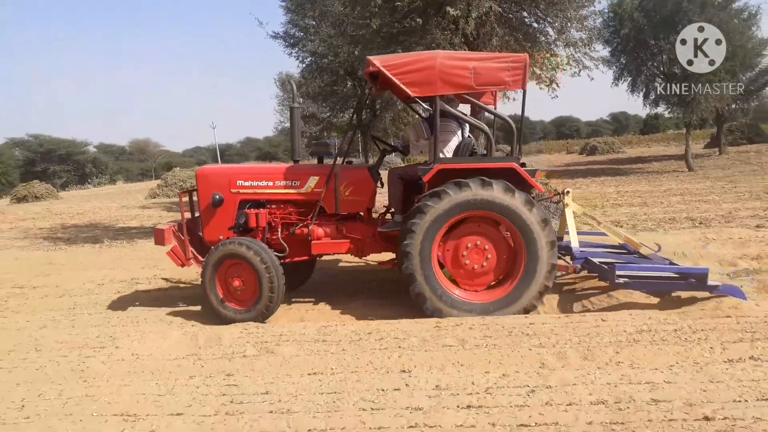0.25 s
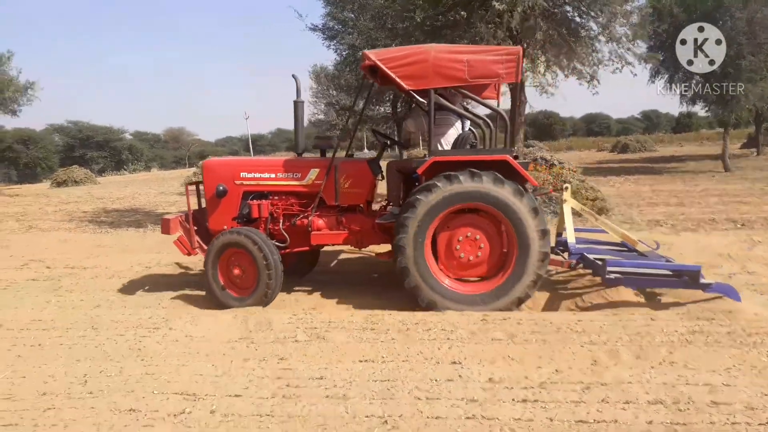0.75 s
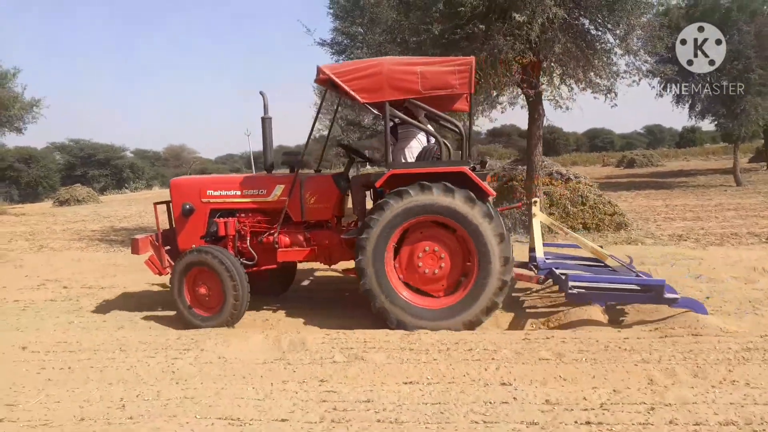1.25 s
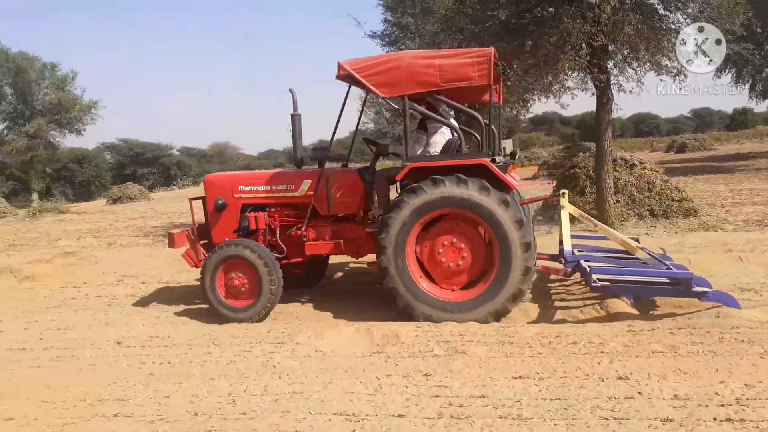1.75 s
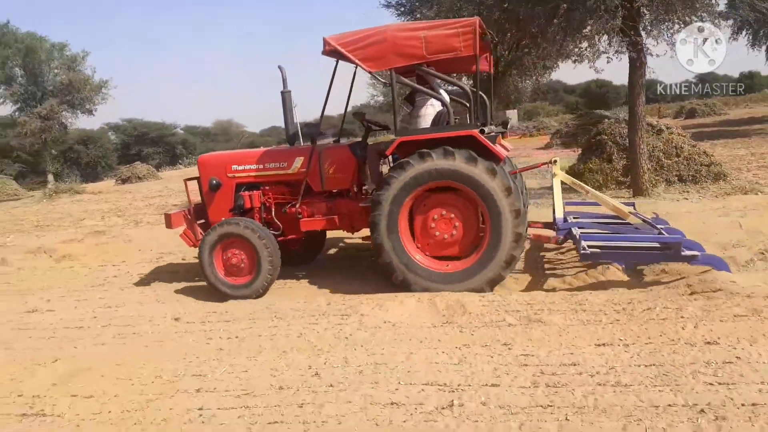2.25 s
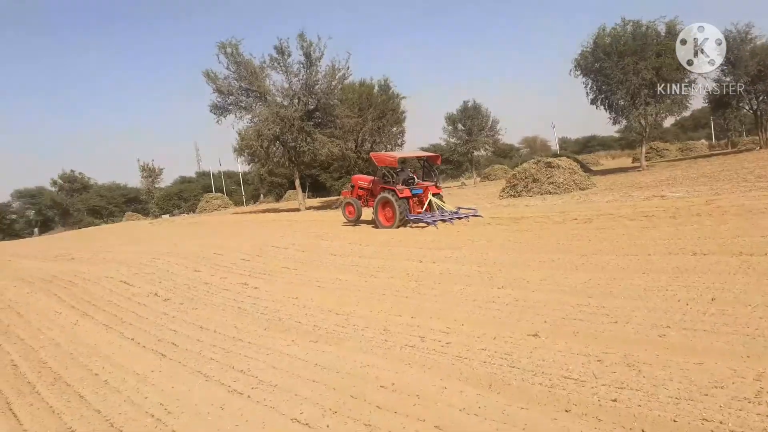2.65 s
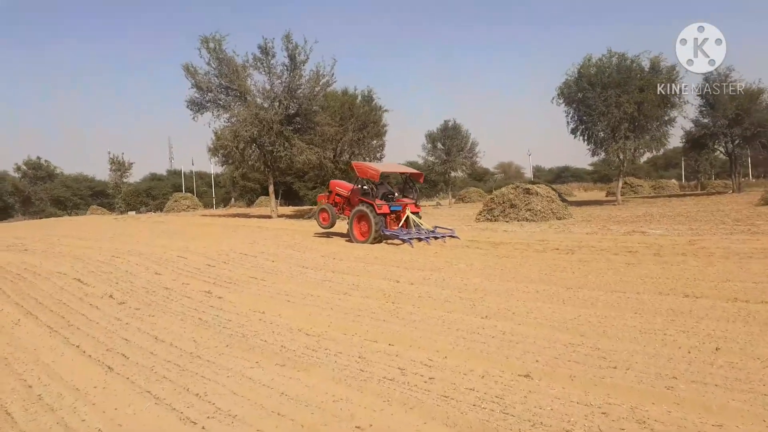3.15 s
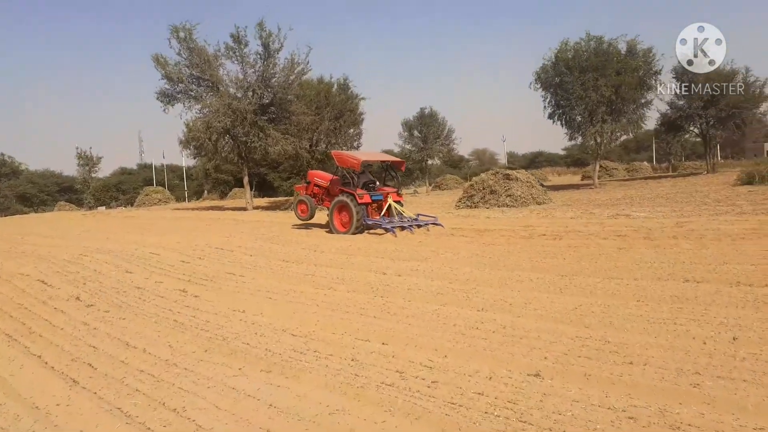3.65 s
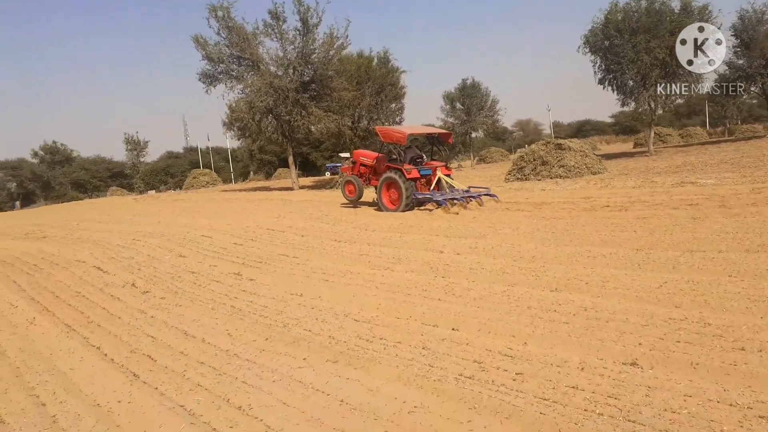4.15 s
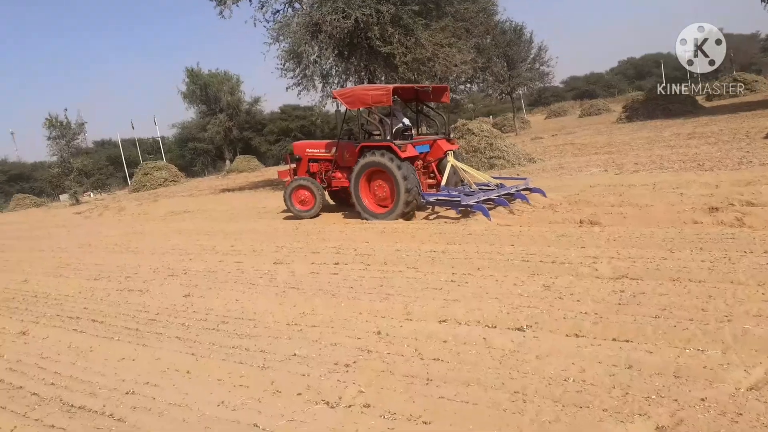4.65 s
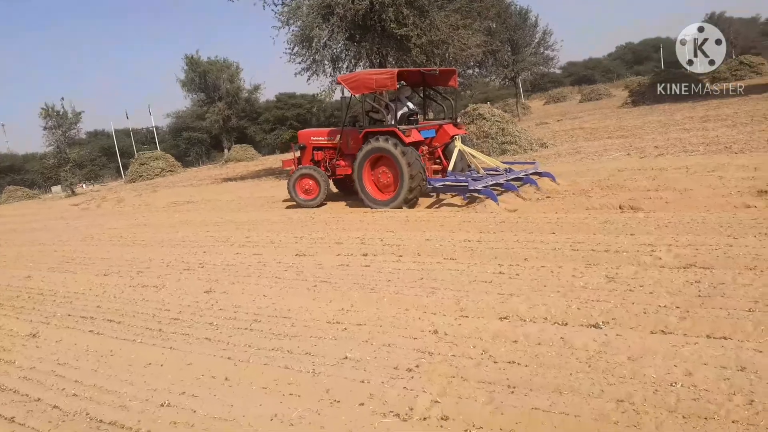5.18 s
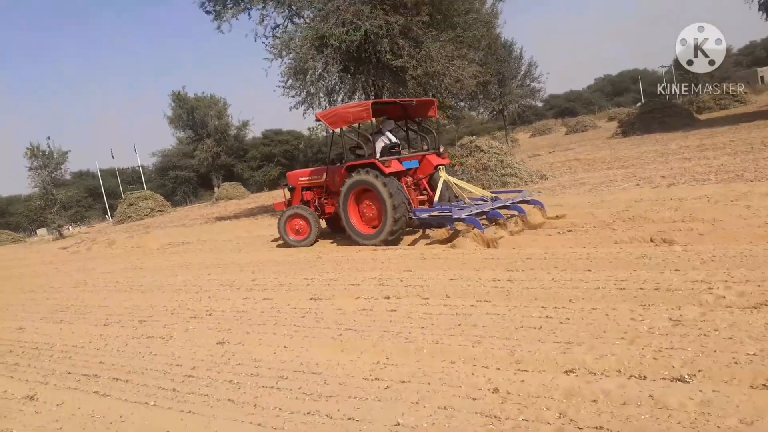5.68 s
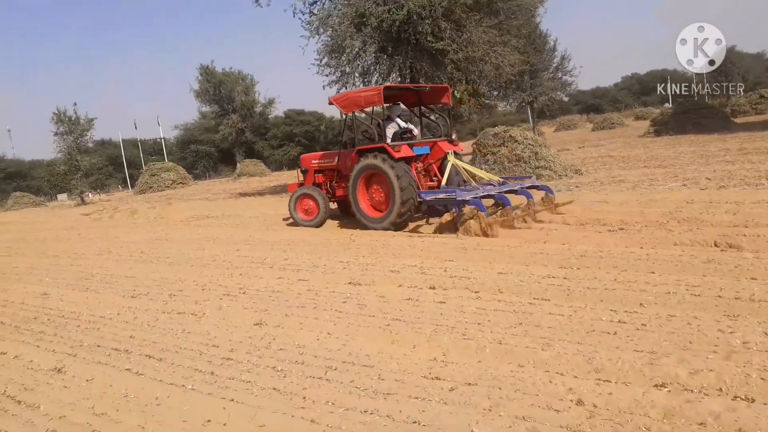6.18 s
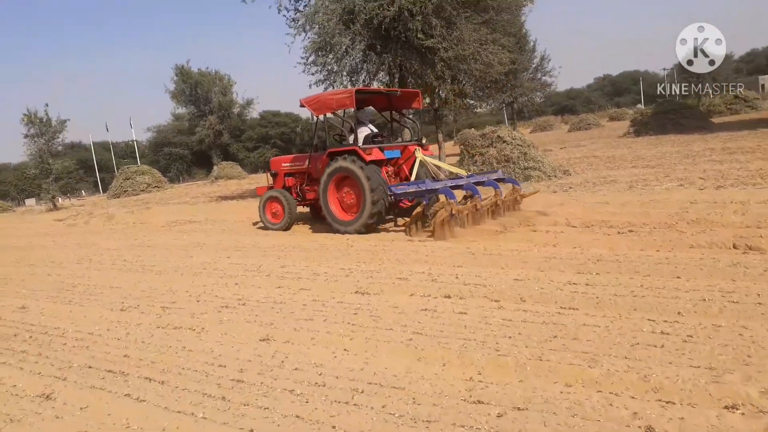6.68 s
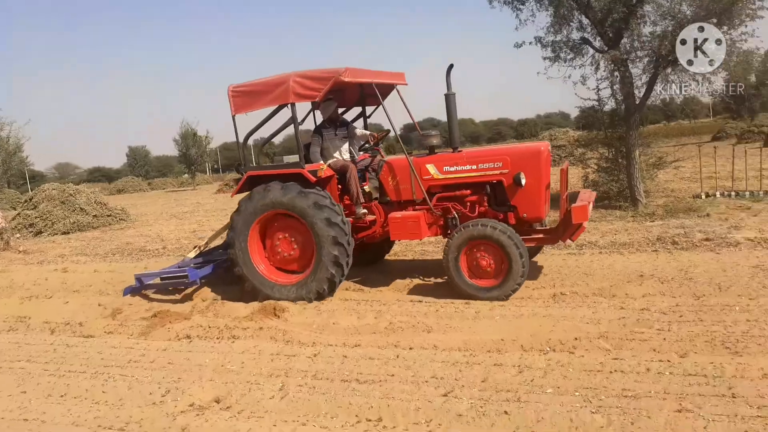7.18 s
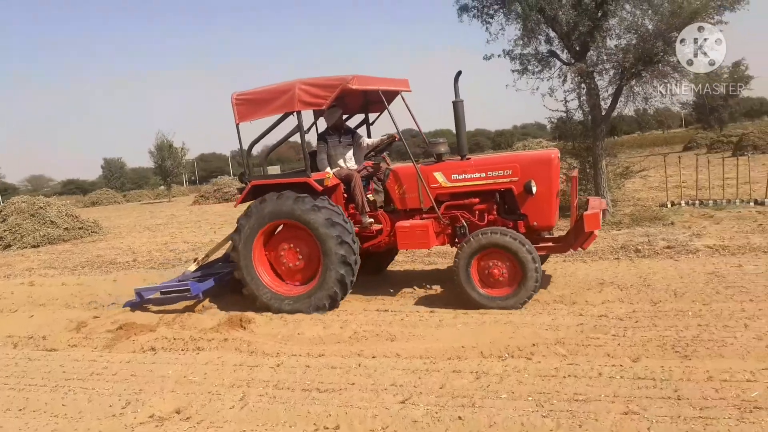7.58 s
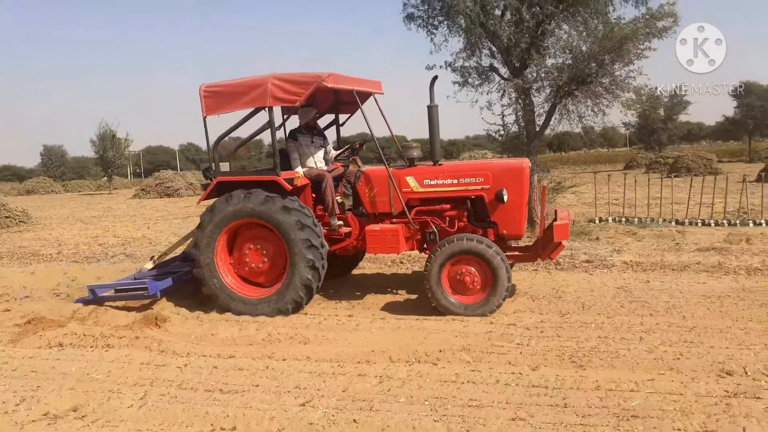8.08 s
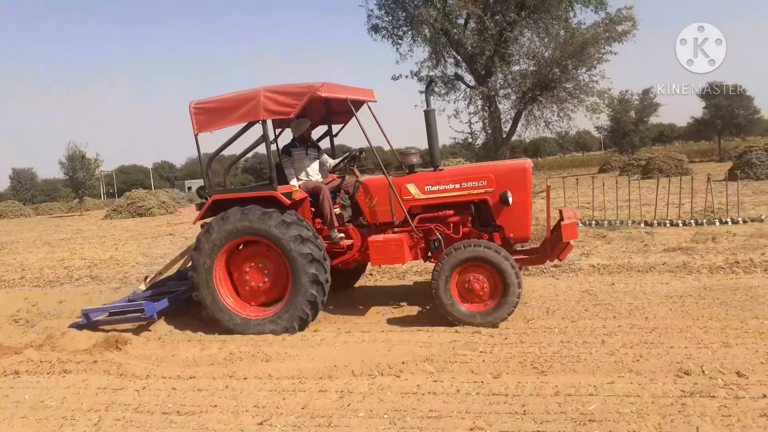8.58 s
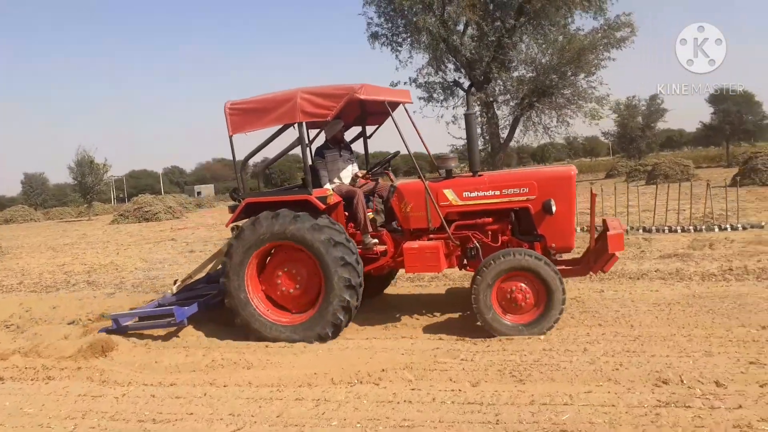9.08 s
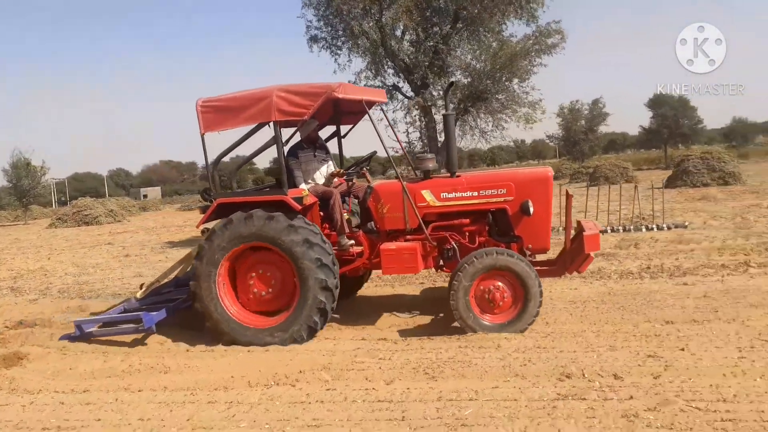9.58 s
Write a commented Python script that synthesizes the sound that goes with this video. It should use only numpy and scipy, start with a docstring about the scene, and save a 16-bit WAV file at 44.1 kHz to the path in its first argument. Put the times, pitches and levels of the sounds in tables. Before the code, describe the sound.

Continuous rapid diesel firing, a low exhaust drone under metallic clatter and gritty rasp, slightly uneven from stroke to stroke. Load makes the pitch sag and the rasp swell. Four outdoor viewpoints are joined abruptly: near, far, middling, near again. Wind rumbles low, with dull thumps striking left or right in the second half. A blink of silence separates the last two views; dry open air, no echo.

```python
"""Diesel tractor working a field

A four-cylinder diesel tractor drags an implement through loose soil, heard from four places in turn.
Each firing booms in the exhaust, rings the metalwork and sets off a burst of clatter and rasp, some harder.
When the soil drags the speed down, the governor feeds more fuel and the rasp swells.
Wind rumbles on two microphone ports and eddies thump them; the sound drops out briefly near 7 s."""
import sys
import numpy as np
from scipy import signal
from scipy.fft import rfft, irfft, next_fast_len
from scipy.io import wavfile
from scipy.ndimage import uniform_filter1d, map_coordinates

SR = 44100
rng = np.random.default_rng(int(sys.argv[2]) if len(sys.argv) > 2 else 0)


def int16_out(signal):
    """Quantize to a 16-bit WAV file."""
    q = np.round(np.clip(np.atleast_2d(signal).T, -1, 1) * 32767)
    wavfile.write(sys.argv[1], SR, q.astype(np.int16))


N = 433503
TIME_S = np.arange(N) / SR

# Listening places: start_s, rasp_rest_db, clatter_rest_db (nominal levels between firings),
# burst_s (nominal), alike_hz (ports differ above), right_lag_samples (rounded in use)
PLACES = [(0, -12, -4, 0.011, 2340, 1.5), (2.655, -15, -5.5, 0.012, 3580, 1.5),
          (4.515, -13, -4.5, 0.013, 1790, -1), (7.0, -19.5, -5, 0.013, 1850, -2.5)]
# Levels per place: clatter_db, rasp_db, rasp_gain_at_full_fuel_db, nearing_db_per_s, breeze_db (before trim)
LEVELS = [(-2, -2.5, 4.5, -0.66, -50), (-3.5, -8.5, 11.5, 1, -39), (-2, -9.5, 10, -0.6, -32),
          (0.5, -7, 6.5, 0.13, -29)]

# Wind spectrum, relative: freq_hz, density_db_per_hz
WIND_COLOUR = [(25, -22), (42, -10), (62, 2.5), (90, 1), (150, -0.5), (230, -1), (345, -12), (640, -24),
               (1200, -46)]
# Gusts on the ports: centre_s, level_db, sigma_s
GUSTS = [(0.418, -31, 0.018), (1.095, -32, 0.044), (1.327, -31, 0.027), (1.593, -35, 0.053),
         (3.27, -36, .022), (6.377, -26.5, 0.08), (8.753, -28, 0.12), (9.578, -29, 0.035)]
# Buffets: start_s, peak_db (nominal), string_length_s, eddy_pitch_hz, left_minus_right_db
BUFFETS = [(4.657, -14, .005, 170, -14), (5.028, -12, .008, 90, 12), (5.047, -13.5, .018, 160, 10),
           (5.32, -16, .016, 221, -8), (5.408, -15, .014, 250, -4), (6.262, -13, .006, 100, 14),
           (6.328, -8.5, .031, 240, 11), (6.416, -10, .006, 135, 10), (6.569, -11, .017, 145, 10),
           (7.24, -12.5, 0.032, 130, -13), (7.6, -10.5, .014, 130, -9), (8.005, -12.5, .012, 220, -11),
           (8.256, -12, .008, 130, -12), (8.338, -12, .02, 150, -12), (8.848, -8.5, .012, 80, 9),
           (8.879, -12, 0.0077, 170, 11), (9.008, -10, .014, 140, -11.5), (9.219, -12, 0.0087, 150, -14),
           (9.358, -12, .016, 119, -13)]

# Engine per place: first_cylinder_firing_s, governed_firing_rate_hz
GOVERNOR = [(0.081, 44.24), (2.707, 44.29), (4.567, 45.16), (7.0302, 43.82)]
# Implement digs in (sag > 0) or rides up (sag < 0): centre_s, firing_rate_sag_hz, half_length_s
DRAG = [(1.28, -1.54, 0.3), (1.98, 1.25, 0.17), (2.89, 6.41, 0.42), (3.36, 5.2, 0.27), (4.53, 3.86, 0.27),
        (5.08, 5.64, 0.62), (7.17, 2.52, 0.19), (8.61, 2.76, 0.26), (9.22, 1.1, 0.57)]
# Sag that opens the rack most of the way, its delay, clatter gained at full fuel
DROOP_HZ, GOVERNOR_LAG_S, FUEL_CLATTER_DB = 2.3, 0.018, 2
# A slower engine is quieter
CLATTER_DB_PER_HZ, RASP_DB_PER_HZ = 0.2554, 0.69
# Driver closes the throttle: time, run-down rate
THROTTLE_OFF_S, COAST_HZ_PER_S = 6.54, 8.2
# Time for the fuel to die away, fall of clatter and rasp without it
CUT_S, CUT_CLATTER_DB, CUT_RASP_DB = 0.18, -6, -4

# Exhaust note per place, before waver and swell: level_db of multiples 1 to 5 of the firing rate
BOOM = [(-37, -26.5, -35, -32.5, -43), (-50, -35, -39, -42, -53), (-43, -30.7, -32.5, -37.5, -44),
        (-40, -28.3, -34, -35.5, -48)]
# Exhaust note gain: time_s, gain_db
BOOM_LEVEL = [(1.4, 1), (2.0, -0.5), (3.05, -1.5), (3.25, 3.5), (3.75, 3), (4.05, -2), (4.55, 2.5),
              (5.6, 1.5), (6.9, -3.5), (7.3, -0.5), (8.8, 0)]
# Silencer resonances at the first place: multiple_of_firing_rate, resonance_hz, level_db (before swell)
OVERTONES = [(8, 354, -37), (12, 525, -35.5)]
# Struck metalwork per place: pitch_hz (mean), level_db (before scatter and swell), ring_s
RINGS = [
    [],
    [],
    [(4380, -39, .005)],
    [(665, -30, .0055)],
]
# Silencer, bonnet and block resonances facing each place: centre_hz, lift_db
PANELS = [
    [(1190, 4.5)],
    [(1355, 4.5), (1665, 3.5), (2100, 6)],
    [(1400, 5.5), (2030, 2.5), (4300, 3)],
    [(975, 3.5), (1170, 3.5)],
]
# Share of the direct noise that repeats each cycle, per place; moving air blurs it: power_share
REPEAT = [.45, .2, .35, .5]
# Harder firings: time_s, extra_db (nominal)
HARD_FIRINGS = [(.604, 2.5), (2.765, 3.5), (3.298, 4), (3.406, 4), (8.671, 3), (8.981, 3), (9.007, 3),
                (9.077, 2.5), (9.356, 3), (9.451, 2)]
# Rasp gain: time_s, gain_db
TREBLE = [(0.0, 2), (.6, -0.5), (2.4, -0.8), (4.6, 1), (5.9, -2), (6.5, -1.2), (7.15, -3), (8.1, -0.5),
          (9.1, 2.5), (9.25, -3.5), (9.42, 3), (9.6, -1), (9.83, 2.5)]
# Bright band sliding past the last place: time_s, centre_hz, lift_db
BRIGHT = [(7.0, 5300, 6), (8.0, 5100, 5.5), (8.65, 5300, 6.5), (9.08, 6060, 4), (9.83, 5640, 3.5)]
# Engine noise spectrum at each place, before swell, left port then right: freq_hz, density_db_per_hz
BESIDE_SPECTRA = ([(150.0, -53.5), (245.0, -55.5), (320, -58), (470.0, -56), (590.0, -65.5), (720.0, -56),
                  (854.0, -62.5), (1152.0, -61.5), (1387.0, -64), (2665.0, -62.5), (3305.0, -69.5),
                  (6212.0, -69.5), (9084.0, -94), (11630.0, -85), (15300.0, -88)], [(150.0, -53),
                  (330, -58), (470.0, -56.5), (590.0, -61), (769.0, -59), (1387.0, -64), (3080.0, -60),
                  (4045.0, -72.5), (5862.0, -70), (8185.0, -65), (10050.0, -76), (11630.0, -67.5),
                  (15300.0, -69.5)])
FAR_SPECTRA = ([(150.0, -57), (284.0, -66.5), (615.0, -66.5), (769.0, -72), (947.0, -68.5), (2117.0, -67.5),
               (3540.0, -81), (4400.0, -91), (5526.0, -74.5), (6576.0, -74), (8626.0, -102), (10559.0, -96),
               (15300.0, -101.0)], [(150.0, -64.5), (615.0, -64.5), (769.0, -77.5), (947.0, -67.5),
               (3540.0, -75.5), (3787.0, -90), (5526.0, -76), (6956.0, -76.5), (8626.0, -99.1),
               (11085.0, -91.5), (15300.0, -102.7)])
BEHIND_SPECTRA = ([(150.0, -53.5), (245.0, -56), (320.0, -63), (400.0, -58.5), (615.0, -61.5), (769.0, -74),
                  (947.0, -64), (2117.0, -66.5), (3540.0, -82), (4316.0, -71.5), (6576.0, -74),
                  (10050.0, -104), (10559.0, -90), (15300.0, -88)], [(150.0, -54.5), (245.0, -54.5),
                  (284.0, -62), (450.0, -58), (769.0, -69.5), (947.0, -67), (1653.0, -67), (2290.0, -73.5),
                  (6956.0, -70.5), (11085.0, -75.5), (15300.0, -90)])
OTHER_SIDE_SPECTRA = ([(150.0, -60.5), (330.0, -64.5), (427.0, -64), (689.0, -60.5), (854.0, -67),
                      (2117.0, -64), (4045.0, -76), (5862.0, -60.5), (7350.0, -64.5), (9084.0, -91),
                      (10559.0, -74.5), (12194.0, -80), (13998.0, -70.5), (15300.0, -80)], [(150.0, -49),
                      (300.0, -57.5), (427.0, -62), (689.0, -60), (854.0, -73), (947.0, -66.5),
                      (2290.0, -68.5), (2472.0, -75), (2665.0, -72), (5526.0, -70), (6956.0, -66),
                      (9558.0, -62), (15300.0, -76.5)])

# Dropout: centre, half length, depth; then the level creeps back
DROPOUT_S, DROPOUT_HALF_S, DROPOUT_DB = 7.004, 0.022, -62
RETURN_DB, RETURN_S = -33, 0.049
TOP_HZ = 15600


def amp(db):
    """Decibels to gain."""
    return 10 ** (np.asarray(db) / 20)


def curve(rows):
    """Second column of a time table, interpolated at every sample."""
    rows = np.array(rows)
    return np.interp(TIME_S, rows[:, 0], rows[:, 1])


def unit(x):
    """Scale to rms 1."""
    return x / np.sqrt(np.mean(x ** 2))


def shape(x, response):
    """Filter by a gain that is a function of frequency."""
    size = next_fast_len(x.shape[-1], True)
    hz = np.maximum(np.fft.rfftfreq(size, 1 / SR), 1)
    return irfft(rfft(x, size) * response(hz), size)[..., :x.shape[-1]]


def below(f, hz, order=4):
    """Low-pass gain; with the frequencies swapped, the matching high-pass."""
    return 1 / np.sqrt(1 + (f / hz) ** (2 * order))


def lift(f, hz, half_width_hz):
    """Bell of a resonance, 1 at its centre."""
    return 1 / (1 + ((f - hz) / half_width_hz) ** 2)


def colour(x, points, low_hz):
    """Filter by a (freq_hz, db) spectrum, closed below low_hz."""
    hz, db = np.transpose(points)
    log_hz = np.log(np.sort(hz))
    return shape(x, lambda f: amp(np.interp(np.log(f), log_hz, db)) * below(low_hz, f))


def walk(rate_hz):
    """Smooth random drift with a spread of 1."""
    knots = rng.standard_normal(2000)
    drift = np.interp(TIME_S * rate_hz, np.arange(len(knots)), knots)
    return unit(uniform_filter1d(drift, int(SR / rate_hz / 2)))


def presence(k):
    """Share of listening place k at every sample; neighbours overlap in a short cross-fade."""
    edges = [max(int(place[0] * SR), 0) for place in PLACES] + [N]
    index = np.arange(N)
    here = (index >= edges[k]) & (index < edges[k + 1])
    return np.maximum(uniform_filter1d(here * 1., SR // 50), 0)


def wind(flutter_db=3, breeze_trim_db=-1.5):
    """Breeze and gusts rumble on each port as independent coloured noise with a random flutter."""
    flutter = unit(amp(flutter_db * np.array([walk(35), walk(35)])))
    breeze = sum(amp(row[-1] + breeze_trim_db) * presence(k) for k, row in enumerate(LEVELS))
    gusts = sum(amp(db) * np.exp(-((TIME_S - s) / sigma_s) ** 2 / 2) for s, db, sigma_s in GUSTS)
    rumble = unit(colour(rng.standard_normal((2, N)), WIND_COLOUR, 28))
    return rumble * flutter * np.hypot(breeze, gusts)


def buffets(spacing=1.25, scatter=0.34):
    """One eddy or a quick string of them; each thumps a port with one push and pull of pressure."""
    out = np.zeros((2, N))
    for s, db, length_s, hz, pan_db in BUFFETS:
        near = slice(int((s - length_s) * SR), int((s + length_s + 1 / 20) * SR))
        for port, side in enumerate([1, -1]):
            gain = amp(db + min(side * pan_db, 0))
            chance = rng.standard_normal((20, 3))
            for after_s, (late, wide, sign) in zip(np.arange(0, length_s, spacing / hz), chance):
                phase = 2 * np.pi * hz * (TIME_S[near] - s - after_s) - late
                u = phase * np.exp(scatter * wide)
                out[port, near] += gain * np.sign(sign) * np.pi * u / (1 + u ** 2) ** 2
    return shape(out, lambda f: below(55, f, order=3))


def crankshaft(start_s, end_s, first_s, governed_hz):
    """Firing rate, firing count, fuel (-1..1) and throttle closure (0..1) as soil drags on the engine."""
    here = lambda s: start_s <= s < end_s
    sag_hz = sum(depth * np.exp(-((TIME_S - s) / half) ** 2) for s, depth, half in DRAG if here(s))
    coasting_s = np.maximum(TIME_S - THROTTLE_OFF_S, 0) * here(THROTTLE_OFF_S)
    hz = np.maximum(governed_hz - sag_hz - COAST_HZ_PER_S * coasting_s, governed_hz / 2)
    firing = np.cumsum(hz) / SR
    firing = firing - np.interp(first_s, TIME_S, firing) + 8  # two cycles on keep the count positive
    fuel = np.tanh(np.interp(TIME_S - GOVERNOR_LAG_S, TIME_S, sag_hz) / DROOP_HZ)
    return hz, firing, fuel, np.minimum(coasting_s / CUT_S, 1)


def effort(over_hz, fuel, closed, clatter_db, rasp_db, fuel_rasp_db):
    """Clatter and rasp gains: grow with speed and fuel, rasp far more; fall as the throttle closes."""
    clatter_db = clatter_db + CLATTER_DB_PER_HZ * over_hz + FUEL_CLATTER_DB * fuel + CUT_CLATTER_DB * closed
    rasp_db = rasp_db + RASP_DB_PER_HZ * over_hz + fuel_rasp_db * fuel + CUT_RASP_DB * closed
    return amp([clatter_db, rasp_db])


def hard_knocks(firing, time_s):
    """Extra dB of the firing under way at every sample: zero except for the hard ones."""
    extra_db = np.zeros(500)
    for s, db in HARD_FIRINGS:
        if time_s[0] < s < time_s[-1]:
            extra_db[int(np.interp(s, time_s, firing) + 1 / 4)] = db
    return extra_db[firing.astype(int)]


def knocks(firing, size=2048):
    """Valves, pistons and gears strike at fixed crank angles: the pattern repeats every four firings."""
    pattern = rng.standard_normal(size)
    return unit(np.interp(firing / 4 % 1 * size, np.arange(size), pattern)) * np.sqrt(1 / 2)


def burst(age_s, strength, length_s, rest_db, rise_s):
    """Envelope of a firing: quick rise, then a bell-shaped fall to the steady running noise."""
    blow = strength * (1 - np.exp(-(age_s / rise_s) ** 2)) * np.exp(-(age_s / length_s) ** 2)
    return np.sqrt(blow ** 2 + amp(rest_db) ** 2)


def stroke_colour(noise, firing, time_s, patchy_db=2.3, patch_hz=300, from_hz=2000, bright_width_hz=600):
    """Each firing favours other patches of treble; at the last place one bright band slides over them."""
    f, t, frames = signal.stft(noise, SR, nperseg=512)
    f, t = f[:, None], t + time_s[0]
    number = np.interp(t, time_s, firing).astype(int)
    patches = rng.standard_normal((500, 200))
    where = np.broadcast_arrays(number, f / patch_hz)
    db = patchy_db * map_coordinates(patches, where, order=1, mode="mirror")
    db = db * below(from_hz, f + 1, order=2)
    when_s, centre_hz, lift_db = np.transpose(BRIGHT)
    bright_db = np.interp(t, when_s, lift_db, left=0)
    db = db + bright_db * lift(f, np.interp(t, when_s, centre_hz), bright_width_hz)
    return signal.istft(frames * amp(db), SR)[1][:, :len(time_s)]


def engine_noise(firing, time_s, age_s, force, hard_db, swell, rest_db, clatter_rest_db, length_s,
                 alike_hz, repeat, common=0.22, grit_db=1.46, rasp_share=0.34):
    """Three noise bands burst at each firing: drumming of block and silencer, diesel clatter, gritty rasp."""
    n = len(age_s)
    direct = np.sqrt(1 - repeat) * rng.standard_normal(n) + np.sqrt(repeat) * knocks(firing)
    # long waves reach both ports alike, short ones mostly differ
    unlike = lambda f: np.sqrt(1 - common) * below(alike_hz, f, order=2)
    noise = shape(direct, lambda f: np.sqrt(1 - unlike(f) ** 2)) + shape(rng.standard_normal((2, n)), unlike)
    noise = stroke_colour(noise, firing, time_s)

    drum_hz, rasp_hz = 800, 3800  # crossovers
    blow = force * amp(hard_db)
    drum = shape(noise, lambda f: below(f, drum_hz))
    drum = drum * unit(burst(age_s, blow, length_s * 0.69, clatter_rest_db - 2.5, 0.0037))
    clatter = shape(noise, lambda f: below(drum_hz, f) * below(f, rasp_hz))
    clatter = clatter * unit(burst(age_s, blow, length_s * 0.85, clatter_rest_db, 0.0025))
    # the rasp is a spray of millisecond impacts
    grit = amp(grit_db * np.repeat(rng.standard_normal(n), SR // 1000)[:n])
    rasp_blow = force * amp(rasp_share * hard_db)
    rasp = shape(noise, lambda f: below(rasp_hz, f, order=10))
    rasp = rasp * unit(grit * burst(age_s, rasp_blow, length_s, rest_db + 1.5, 0.0049))
    return (drum + clatter) * swell[0] + amp(0.5) * rasp * swell[1]


def panels(f, modes, sharpness=55, base_db=-.5):
    """Gain of the ringing metalwork that all engine noise passes through."""
    return amp(base_db + sum(db * lift(f, hz, hz / sharpness) for hz, db in modes))


def ringing(firing, age_s, hard_db, modes, scatter_db=2.0, detune=0.027, rise_s=0.0027, hard_gain=3.1):
    """Each firing strikes the metalwork at its own strength and pitch; hard ones ring far more."""
    out = 0
    for hz, db, ring_s in modes:
        size, pitch, phase = rng.standard_normal((500, 3))[firing.astype(int)].T
        rise = 1 - np.exp(-(age_s / rise_s) ** 2)
        decay = np.exp(-np.maximum(age_s - rise_s, 0) / ring_s)
        release = np.minimum(10 * (1 - firing % 1), 1)  # silent by the next firing
        strength_db = db + np.where(hard_db > 0, hard_gain * hard_db, scatter_db * size)
        tone = np.sin(2 * np.pi * (hz * (1 + detune * pitch) * age_s + phase))
        out = out + amp(strength_db) * rise * decay * release * tone
    return out


def overtones(firing, hz, half_width_hz=14):
    """High multiples of the firing rate sing out when they land on a resonance of the silencer."""
    return sum(amp(db) * lift(k * hz, at_hz, half_width_hz) * np.sin(2 * np.pi * k * firing)
               for k, at_hz, db in OVERTONES)


def exhaust(firing, hz, orders_db, waver_db=1.5, rough_db=1, pipe_hz=184, pipe_db=8):
    """Multiples of the firing rate: higher ones waver more, any near the pipe's own note swells."""
    out = 0
    for k, db in enumerate(orders_db, 1):
        knots = rng.standard_normal(500)
        waver = np.interp(firing, np.arange(len(knots)), knots) * (waver_db + rough_db * (k - 2))
        level_db = db + waver + pipe_db * lift(k * hz, pipe_hz, 5.4)
        out = out + amp(level_db) * np.cos(2 * np.pi * k * firing + np.pi * k * k / 2)
    return out


def tractor(scatter_db=.6):
    """One crankshaft drives boom and noise; each listening place hears them in its own colour."""
    # unequal cylinders make the engine lope
    cylinders_db = np.array([0.99, -0.98, -1.4, 0.43])
    starts_s = [place[0] for place in PLACES] + [N / SR]
    out = np.zeros((2, N))
    for k, spectra in enumerate([BESIDE_SPECTRA, FAR_SPECTRA, BEHIND_SPECTRA, OTHER_SIDE_SPECTRA]):
        _, rest_db, clatter_rest_db, length_s, alike_hz, lag = PLACES[k]
        clatter_db, rasp_db, fuel_rasp_db, nearing_db_per_s, _ = LEVELS[k]
        first_s, governed_hz = GOVERNOR[k]
        fade = presence(k)
        on = fade > 1e-6
        time_s = TIME_S[on]

        crank = crankshaft(starts_s[k], starts_s[k + 1], first_s, governed_hz)
        hz, firing, fuel, closed = (v[on] for v in crank)
        force_db = cylinders_db[np.arange(500) % 4] + scatter_db * rng.standard_normal(500)
        force = amp(force_db)[firing.astype(int)]
        rasp_db = rasp_db + curve(TREBLE)[on]
        swell = effort(hz - governed_hz, fuel, closed, clatter_db, rasp_db, fuel_rasp_db)
        swell = swell * amp(nearing_db_per_s * (time_s - starts_s[k]))
        age_s = firing % 1 / hz
        hard_db = hard_knocks(firing, time_s)

        noise = engine_noise(firing, time_s, age_s, force, hard_db, swell, rest_db, clatter_rest_db,
                             length_s, alike_hz, REPEAT[k])
        noise = shape(noise, lambda f: panels(f, PANELS[k]))
        left, right = (colour(port, points, 80.0) * np.sqrt(SR / 2) for port, points in zip(noise, spectra))
        ports = np.array([left, np.roll(right, round(lag))])

        tones = exhaust(firing, hz, BOOM[k]) * amp(curve(BOOM_LEVEL)[on])
        tones = tones + ringing(firing, age_s, hard_db, RINGS[k])
        if k == 0:
            tones = tones + overtones(firing, hz)
        # noise fades by power, tones by amplitude
        out[:, on] += ports * np.sqrt(fade[on]) + tones * swell[0] * fade[on]
    return out


def scene():
    """Wind, buffets and the tractor."""
    return wind() + buffets() + tractor()


def record(dry):
    """The sound drops out for a moment and creeps back; the top is cut."""
    since_s = TIME_S - DROPOUT_S
    gap_db = DROPOUT_DB * np.exp(-((since_s / DROPOUT_HALF_S) ** 2) ** 2)
    return_db = RETURN_DB * np.exp(-np.abs(since_s) / RETURN_S) * (since_s > 0)
    return shape(dry * amp(np.minimum(gap_db, return_db)), lambda f: below(f, TOP_HZ, order=70))


dry = scene()
out = record(dry)
int16_out(out)
```